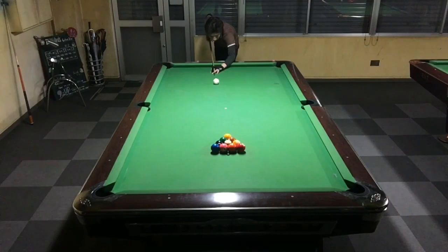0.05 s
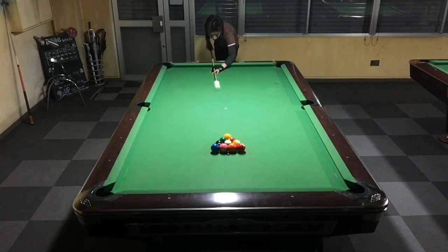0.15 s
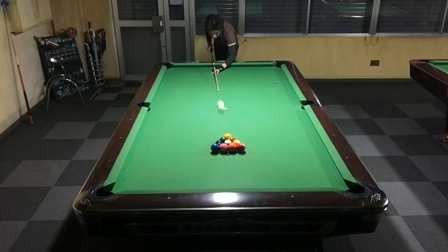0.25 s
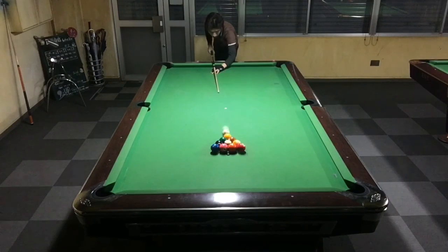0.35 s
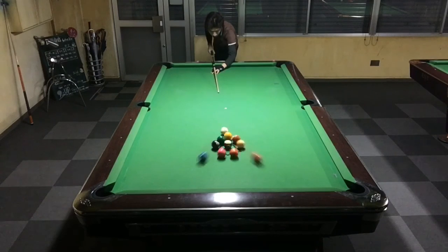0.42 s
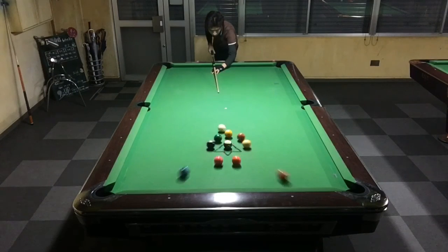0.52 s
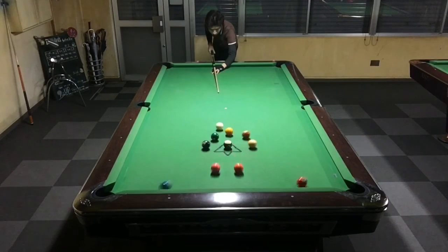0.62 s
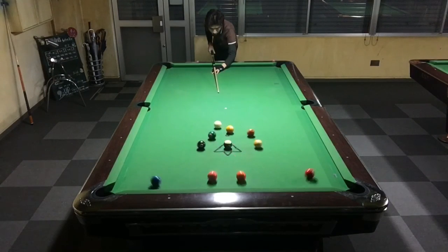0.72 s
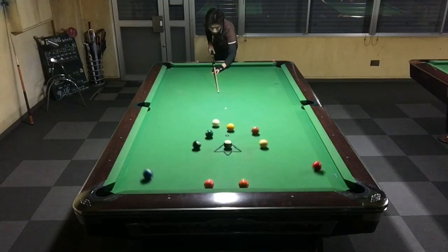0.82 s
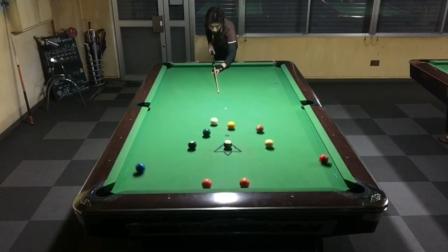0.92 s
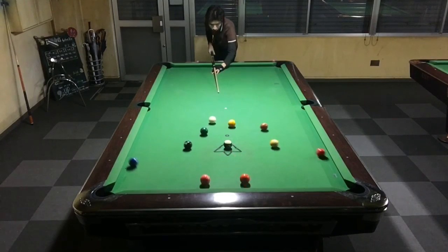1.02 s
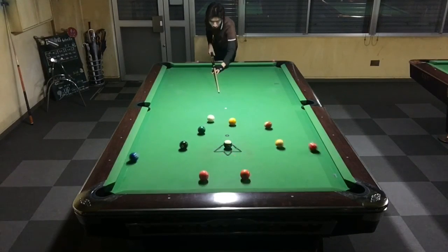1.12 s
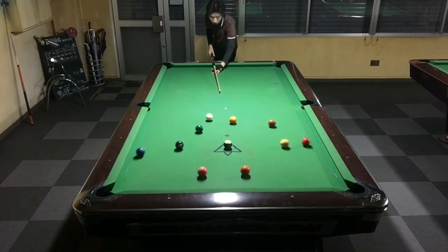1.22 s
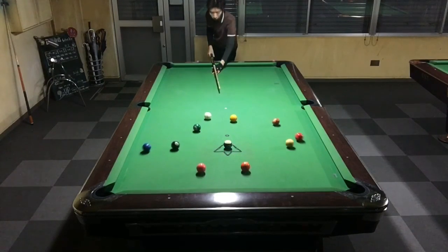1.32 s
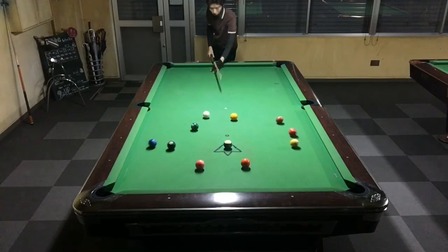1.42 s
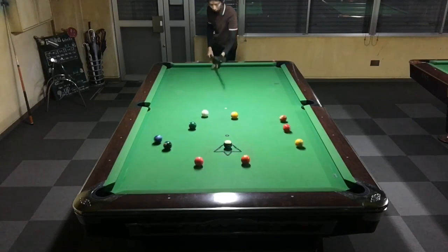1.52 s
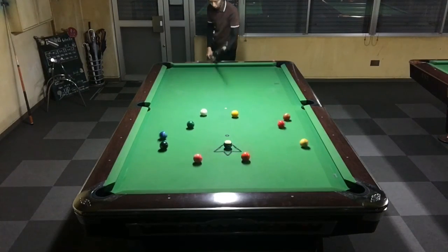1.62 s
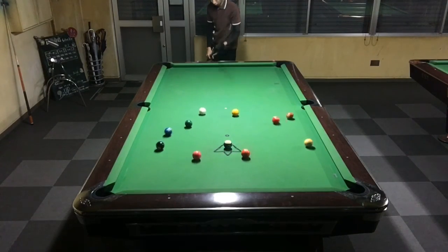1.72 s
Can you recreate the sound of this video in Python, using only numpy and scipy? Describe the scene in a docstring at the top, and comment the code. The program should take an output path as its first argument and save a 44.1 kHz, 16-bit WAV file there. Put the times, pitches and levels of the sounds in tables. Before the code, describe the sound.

A pool break shot: a cue knocks the cue ball, which rolls briefly and bursts the rack in a loud volley of clacks. Balls rumble and thud into the cushions in a quiet, echoing hall.

```python
"""A break shot in a quiet, hard-walled billiard hall, the microphone at the foot of the table.
Over faint ventilation the cue knocks the cue ball and rings briefly. The ball runs down the cloth
and bursts the rack in a volley of clacks, and the recorder's gain ducks. The balls rumble over the
slate and thud into the cushions while the hall rings out and the gain creeps back."""
import sys
import numpy as np
from scipy import signal
from scipy.fft import rfft, irfft
from scipy.io import wavfile
from scipy.ndimage import uniform_filter1d, minimum_filter1d

SR = 44100
rng = np.random.default_rng(int(sys.argv[2]) if len(sys.argv) > 2 else 0)


def generate_wav(sig):
    """Save sig (samples, or channels by samples) to the path in sys.argv[1] as 16-bit PCM at SR."""
    pcm = np.round(np.clip(np.atleast_2d(sig).T, -1, 1) * 32767).astype(np.int16)
    wavfile.write(sys.argv[1], SR, pcm)


N = 79380
TIME_S, FREQ_HZ = np.arange(N) / SR, np.fft.rfftfreq(N, 1 / SR)


def rack(hall, burst_s=.433):
    """The pack bursts: each collision is one short pulse, scattered by the table and the hall."""
    # ball against ball: start_s, level_db, pitch_ratio
    collisions = [(0.4319, -2, 0.97), (0.4336, -3.5, 1.1), (0.4354, -5, 0.93), (0.4374, -9, 1),
                  (0.4413, -5.5, 1.1), (.4421, -3.5, 1), (0.4443, -9, 1.05), (0.4456, -6.5, 1.05),
                  (0.4505, -3.5, 1), (0.4537, 1, 1.1), (.4549, 4, 1.1), (0.4573, 3.5, 1.08),
                  (0.459, 1.5, 1.08), (.4600, -1, 1.05), (.4700, -9, 0.81), (0.4717, -4, .95),
                  (0.4895, -7.5, 1.05), (0.4927, -7, 1.1), (0.499, -5, .9), (0.5111, -9, 0.87),
                  (0.5332, -8.5, .95), (0.5481, -11.5, .95), (0.5678, -6.5, .95)]
    clacks, jostle, fizz = np.zeros((3, N))
    for start_s, level_db, pitch_ratio in collisions:
        add(clacks, start_s, amp(level_db) * clack(pitch_ratio))
    # collisions deep in the pack reach the microphone only by way of the hall
    count, spread_s, fade_db_per_s = 16, .06, 71.5
    for k, (jitter, contact) in enumerate(rng.random((count, 2))):
        late_s = spread_s * (k + jitter) / count
        add(jostle, burst_s + late_s, amp(-2.5 - fade_db_per_s * late_s) * clack(.9 + .15 * contact))
    slate_and_rails = rng.standard_normal(N) * decay(t60_s=.027)
    scatter = amp(-5.5) * convolve(clacks, slate_and_rails / np.linalg.norm(slate_and_rails))
    # faint fizz on top of the first crack: freq_hz, level_db
    fizz_colour = [(1500, -30), (4500, -0.5), (8000, -4.5), (16000, -2.5)]
    add(fizz, burst_s, amp(-52) * noise(fizz_colour) * decay(t60_s=.24))
    return clacks + scatter + convolve(amp(.5) * clacks + jostle, hall) + fizz


def clack(pitch_ratio, centre_hz=2320, width_hz=1900):
    """Two balls meet in a pulse of two or three cycles; a shorter contact sounds higher."""
    # one hard resin contact: freq_hz, level_db
    colour = [(100, -45.5), (300, -29), (600, -24), (900, -16), (1300, -5), (2000, -2.5), (2750, 0),
              (3300, -12), (4300, -23.5), (5200, -37), (6200, -39.5), (8000, -59.5), (16000, -70.5)]
    radius = np.exp(-np.pi * width_hz / SR)
    poles = [1, -2 * radius * np.cos(2 * np.pi * centre_hz * pitch_ratio / SR), radius ** 2]
    return signal.lfilter(poles[::-1], poles, impact(colour, pitch_ratio))   # all-pass spreads the pulse


def cue(hall, start_s=.2128):
    """One dull knock, a bright tick thrown at the walls, and the shaft ringing after it."""
    # knock of the leather tip: freq_hz, level_db
    knock_colour = [(60, -26.5), (150, -9), (480, 0), (1000, -2), (1500, -7), (1800, -22), (2500, -19.5),
                    (3500, -40), (6000, -52.5), (16000, -63)]
    # tick of the shaft, heard off the walls: freq_hz, level_db
    tick_colour = [(300, -27), (1700, -12), (2100, 0), (2850, -2.5), (3500, -12.5), (4800, -21.5),
                   (6100, -20), (8000, -34), (10000, -43), (16000, -45)]
    # ring of the shaft: pitch_hz, level_db, t60_s
    shaft_modes = [(412, -30.5, .3), (1062.7, -35.5, .1), (1937, -37.5, .45), (2108, -42, .3),
                   (2882, -34.5, .18), (3126, -45.5, .35)]
    knock, tick, ring = np.zeros((3, N))
    add(knock, start_s, amp(-10.5) * impact(knock_colour))
    add(tick, start_s, amp(-11.5) * impact(tick_colour))
    for pitch_hz, level_db, t60_s in shaft_modes:
        add(ring, start_s, amp(level_db) * np.sin(2 * np.pi * pitch_hz * TIME_S) * decay(t60_s))
    return knock + ring + convolve(amp(2) * knock + tick + amp(-5) * ring, hall)


def cushions(hall):
    """Soft blows on the rails set the table body booming."""
    # balls into the rubber cushions: start_s, level_db
    blows = [(0.439, -25.5), (.53, -27.5), (.605, -26.5), (.675, -24.5), (.87, -37.5), (.96, -38.5),
             (1.09, -45), (1.16, -46)]
    # one thud: freq_hz, level_db
    colour = [(40, -22.5), (80, -3.5), (120, -0.5), (190, -3), (280, -4), (420, -3), (800, -8.5),
              (1500, -28), (5000, -70.5)]
    thuds, pulse = np.zeros(N), impact(colour)
    for start_s, level_db in blows:
        add(thuds, start_s, amp(level_db) * pulse)
    return thuds + amp(1.5) * convolve(thuds, hall)


def rolling(slate_hz=116, width_hz=10):
    """Low rumble with the boom of the slate, fading as the balls slow."""
    # rise and fall of the rumble: time_s, level_db
    levels = [(.21, -72), (.24, -40.5), (.4, -41.5), (.5, -42), (.7, -46.5), (.95, -56), (1.25, -64),
              (1.8, -73)]
    # balls on cloth and slate: freq_hz, level_db
    colour = [(30, -32), (65, -6), (90, -6.5), (120, -3.5), (180, 0.5), (280, -3), (420, -1), (550, -13),
              (750, -11), (1500, -20.5), (4000, -42.5), (16000, -66)]
    rumble = noise(colour)
    boom = signal.lfilter(*signal.iirpeak(slate_hz, slate_hz / width_hz, fs=SR), rumble)
    envelope = amp(np.interp(TIME_S, *np.transpose(levels)))
    return envelope * (rumble + amp(-5.5) * boom / boom.std())


def ventilation():
    """Room tone: the steady low rush of the hall's ventilation."""
    # moving air: freq_hz, level_db
    colour = [(25, -11), (65, 0.5), (120, -4.5), (160, -3.5), (225, 3), (320, -14.5), (700, -17.5),
              (1000, -24), (2500, -28.5), (4000, -36.5), (6500, -41.5), (10000, -48), (16000, -49.5)]
    return amp(-57) * noise(colour)


def hall_response(band_count=14, gap_s=.0019, build_s=.0046):
    """Hard walls return quick early reflections over a long tail whose treble dies first."""
    # reverberation time of the hall: freq_hz, t60_s
    tail_times = [(80, 1.5), (400, 1.04), (1000, 1.17), (2000, 1.015), (3000, 0.83), (4500, .68),
                  (8000, 0.68), (16000, .35)]
    white = rfft(rng.standard_normal(N))
    centres_hz = np.geomspace(80, 16000, band_count)
    bands = [irfft(white * at_hz(np.c_[centres_hz, share], FREQ_HZ), N) for share in np.eye(band_count)]
    build = 1 - np.exp(-np.maximum(TIME_S - gap_s, 0) / build_s)
    early = amp(6.5) * decay(t60_s=.16)
    fades = [build * np.hypot(early, decay(t60_s)) for t60_s in at_hz(tail_times, centres_hz)]
    return sum(band * fade for band, fade in zip(bands, fades)) / np.linalg.norm(fades[band_count // 2])


def amp(db):
    """Decibels to gain."""
    return 10 ** (np.asarray(db) / 20)


def at_hz(points, hz):
    """Read a table along log frequency."""
    points_hz, values = np.transpose(points)
    return np.interp(np.log(np.maximum(hz, 1)), np.log(points_hz), values)


def decay(t60_s):
    """Envelope that falls by 60 dB in t60_s."""
    return np.exp(-np.minimum(np.log(1000) * TIME_S / t60_s, 60))


def convolve(x, response):
    """Play x through a response."""
    return signal.fftconvolve(x, response)[:N]


def add(track, start_s, sound):
    """Mix a sound in at a time."""
    i = max(int(start_s * SR), 0)
    track[i:i + len(sound)] += sound[:max(N - i, 0)]


def noise(colour):
    """Steady noise of a given colour, rms 1."""
    x = irfft(rfft(rng.standard_normal(N)) * amp(at_hz(colour, FREQ_HZ)), N)
    return x / x.std()


def impact(colour, pitch_ratio=1, size=4096):
    """The tightest causal pulse with a given colour, peak 1."""
    spectrum = amp(at_hz(colour, np.fft.rfftfreq(size, 1 / SR) / pitch_ratio))
    cepstrum = irfft(np.log(spectrum))
    cepstrum[1:size // 2] *= 2   # fold to minimum phase
    cepstrum[size // 2 + 1:] = 0
    pulse = irfft(np.exp(rfft(cepstrum)))
    return pulse / np.abs(pulse).max()


def scene():
    """The shot and the room tone at one microphone at the foot of the table."""
    hall = hall_response()
    return (cue(hall) + rack(hall) + cushions(hall) + rolling() + ventilation())[None]


def record(dry):
    """The recorder's gain ducks just ahead of the peak, holds, then creeps back, hissing faintly."""
    limit_db, recovery_db_per_s = -12.5, 18.5
    window_s, attack_s, hold_s = .014, .003, .12
    power = uniform_filter1d(dry[0] ** 2, int(window_s * SR))
    over_db = np.maximum(10 * np.log10(np.abs(power) + 1e-12) - limit_db, 0)
    hold_samples = 2 * int(hold_s * SR / 2) + 1
    held_db = -minimum_filter1d(-over_db, hold_samples, origin=hold_samples // 2, mode="constant")
    ramp_db = recovery_db_per_s * TIME_S
    released_db = np.maximum.accumulate(held_db + ramp_db) - ramp_db
    ahead_db = np.interp(TIME_S + attack_s, TIME_S, released_db)
    duck_db = uniform_filter1d(ahead_db, int(2 * attack_s * SR))
    # hiss while the gain is down: freq_hz, level_db
    hiss_colour = [(1000, -1.5), (6000, -1), (10000, -6.5), (16000, -9.5)]
    hiss = amp(-72.5) * noise(hiss_colour) * np.tanh(2 * duck_db)
    top_cut = signal.cheby2(16, 60, 16500, fs=SR, output="sos")   # 60 dB down from 16.5 kHz
    return signal.sosfilt(top_cut, (dry + hiss) * amp(-duck_db))


dry = scene()
out = record(dry)
generate_wav(out)
```